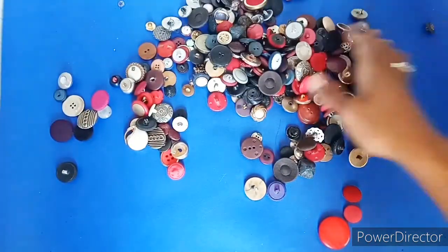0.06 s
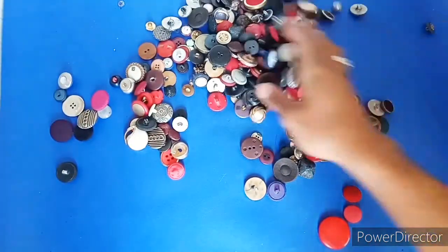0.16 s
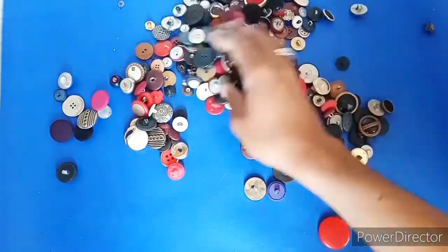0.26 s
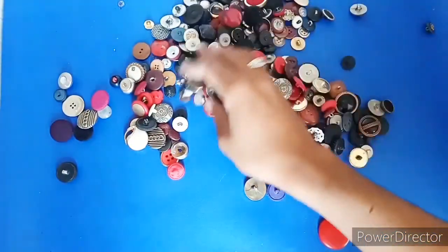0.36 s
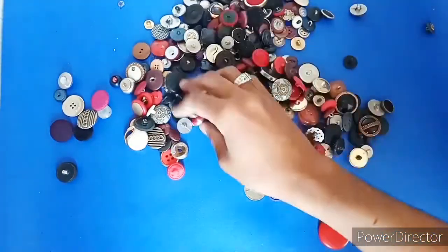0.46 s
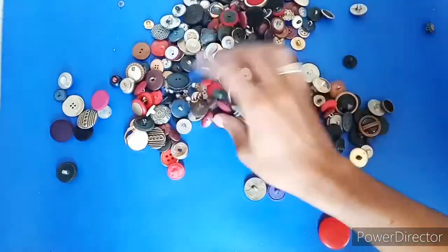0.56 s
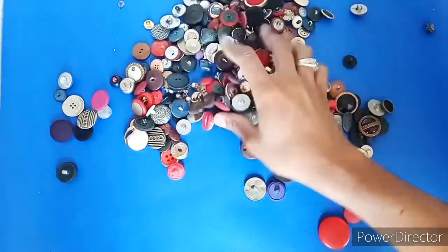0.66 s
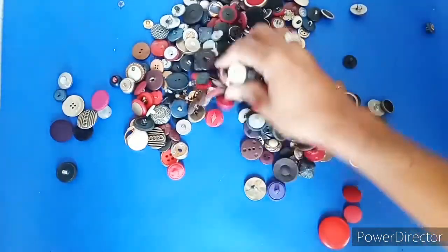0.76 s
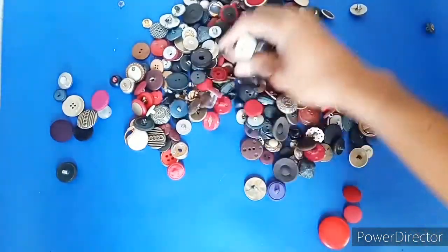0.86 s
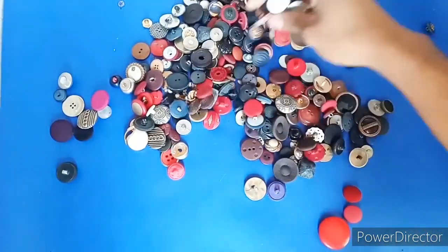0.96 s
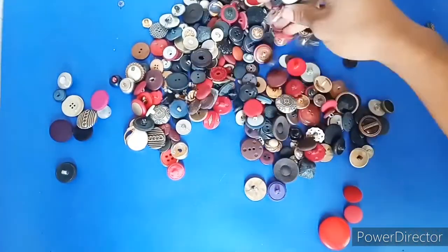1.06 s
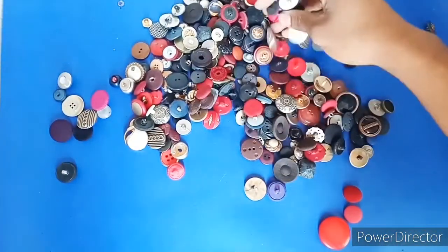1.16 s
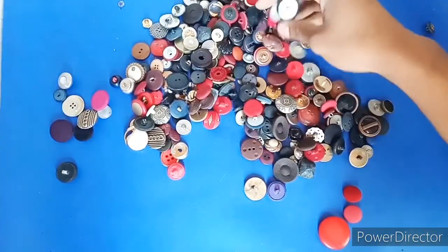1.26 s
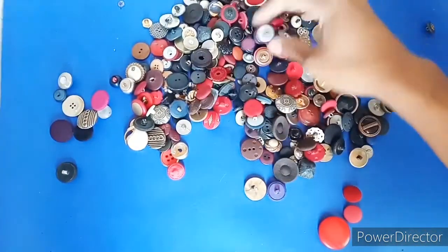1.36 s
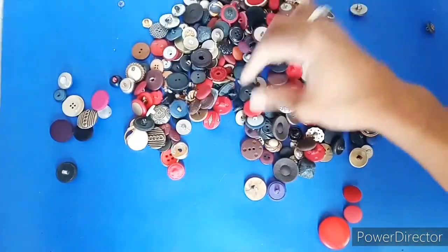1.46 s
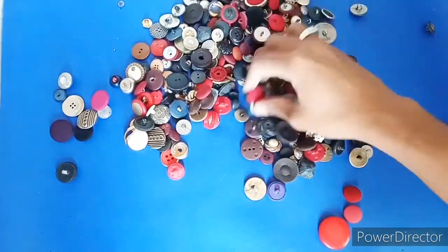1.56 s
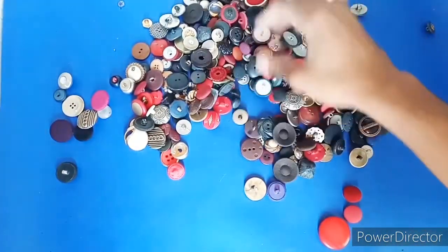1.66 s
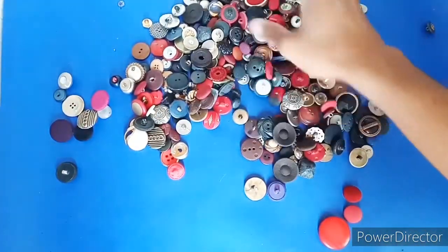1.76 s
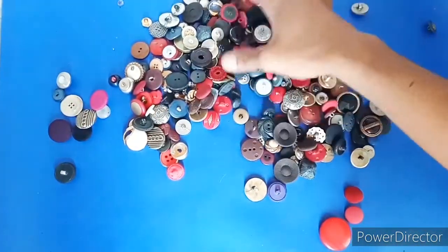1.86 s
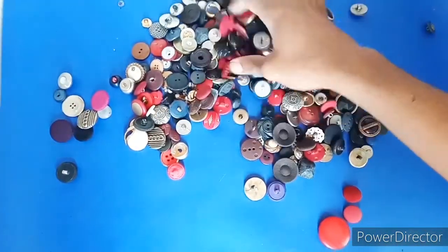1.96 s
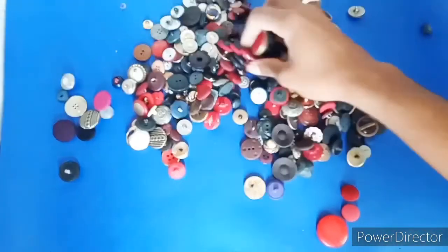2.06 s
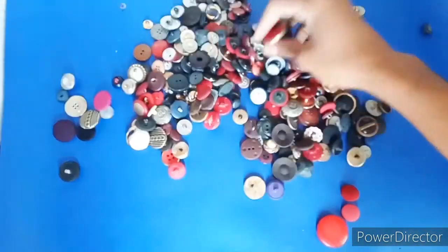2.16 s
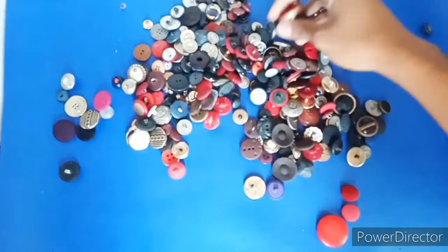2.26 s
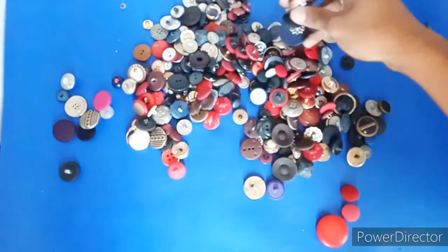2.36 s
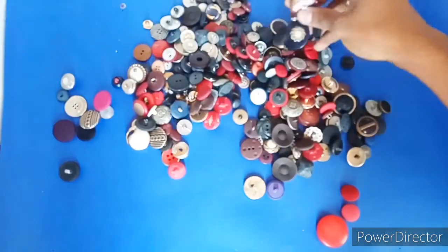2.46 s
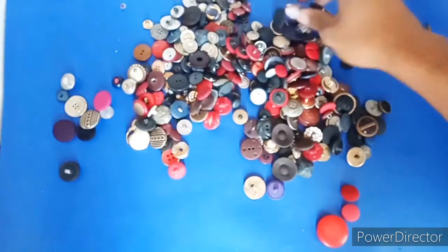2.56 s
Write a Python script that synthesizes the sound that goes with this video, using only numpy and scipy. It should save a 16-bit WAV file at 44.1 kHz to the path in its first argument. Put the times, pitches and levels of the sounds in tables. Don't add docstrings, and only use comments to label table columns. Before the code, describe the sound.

Buttons being stirred and dropped in a pile, clicking and knocking in bursts on a thin board

```python
import sys
import numpy as np
from scipy import signal
from scipy.fft import rfft, irfft
from scipy.io import wavfile
from scipy.ndimage import uniform_filter1d

SR = 44100
rng = np.random.default_rng(int(sys.argv[2]) if len(sys.argv) > 2 else 0)


def invert_db(level):
    return 10 ** (np.asarray(level, dtype=float) / 20)


def unload_wav(signal):
    wavfile.write(
        sys.argv[1],
        SR,
        np.round(np.clip(np.atleast_2d(signal).T, -1, 1) * 32767).astype(np.int16),
    )


N = 114660

# f/Hz, level/dB
HUSH_SPECTRUM = [(18, -33), (30, 16.5), (709, 6.5), (917, 3.5), (1570, -0.5), (1980, 6.5), (13000, -21.5),
                 (14000, -61)]
# f/Hz, level/dB
RUB_SPECTRUM = [(30, -27), (100, -17), (155, -3.5), (200, -9.5), (265, 2.5), (340, -2)]
# start t/s, length t/s, level/dB, f/Hz, t60 t/s
DRAGS = [
    (0.39, 0.027, -46.5, 6950, 0.042),
    (.63, 0.012, -56, 7100, .02),
    (1.721, 0.054, -41, 639, 0.12),
    (1.801, 0.024, -46.5, 625, 0.02),
    (2.002, 0.11, -39.5, 906, 0.078),
    (2.061, 0.041, -54, 7160, 0.041),
    (2.117, 0.086, -38, 1644, 0.033),
]
# f/Hz, level/dB, t60 t/s
BOARD_MODES = [(476.2, -10.5, 0.54), (610, 4.5, 0.11), (635, 9.5, 0.052), (797, 11, 0.017),
               (907, 14.5, 0.048), (955, 15.5, 0.019), (1200, 13.5, 0.023), (1567, 17, 0.019),
               (1894, 4.5, 0.071)]
# f/Hz, level/dB
BUTTON_SPECTRUM = [(1060, -30), (1800, 2.5), (2490, -6), (4360, 1.5), (5260, -10), (7230, -12.5),
                   (8440, -22.5), (13100, -43), (14000, -46)]
# t/s, stirring force level/dB, clack share level/dB re force
SWEEPS = [
    [(0, -34, -5.5), (.015, -41, -4.5), (.05, -50, -5), (.09, -57.5, -8), (.13, -108.5, 10)],
    [(.19, -82, -10), (.208, -47.5, 1), (.236, -61.5, 12.5), (.241, -31, -0.5), (.3, -24, -3.5),
     (.45, -31.5, -4.5), (.53, -27.5, -8), (.65, -35.5, -6.5), (.72, -35, -6.5), (.8, -46.5, -6)],
    [(.805, -49.5, -8), (.83, -37.5, -1), (.9, -24, -5.5), (.96, -38, -6), (1.03, -40, -2.5),
     (1.06, -40, -16), (1.1, -36.5, -6), (1.14, -53, -4.5), (1.2, -49, -8)],
]
# t/s, stirring force level/dB, clack share level/dB re force
LATER_SWEEPS = [
    [(1.222, -29.5, -5), (1.27, -30, -19), (1.33, -25, -12.5), (1.41, -43.5, -13), (1.45, -30, -7),
     (1.5, -39, -17.5), (1.6, -46.5, -13), (1.66, -53, -10)],
    [(1.665, -44, -10), (1.685, -38, -3.5), (1.74, -35.5, -3.5), (1.79, -46, -8), (1.82, -51.5, -6),
     (1.85, -69, -19), (1.95, -77, -6)],
    [(1.945, -75, -6), (1.962, -52, -7), (1.975, -50.5, -13), (2.02, -35, 0), (2.16, -27.5, -4),
     (2.26, -36.5, -7), (2.32, -37.5, 3), (2.39, -51, -2), (2.54, -58, -8.5)],
    [(2.552, -49, -34.5), (2.565, -47, 2), (2.575, -42, -2.5), (2.6, -45, -9)],
]
# t/s, peak level/dB, favoured mode f/Hz, bunch length t/ms
KNOCKS = [(0.012, -28.5, 650, 4.4), (.209, -41, 564, 5.2), (.244, -24.5, 620, 13), (.36, -16.5, 1200, 4),
          (.498, -14.5, 646, 3.6), (0.537, -28, 920, 4.4), (0.678, -35, 606, 18), (.818, -34, 619, 5),
          (.857, -21.5, 630, 5), (.962, -26, 580, 6.2), (1.294, -25, 900, 4.7), (1.527, -32.5, 870, 5.7),
          (1.69, -31, 611, 5.5), (1.926, -57, 620, 3), (1.972, -36, 842, 4), (2.009, -27, 883, 11.4),
          (2.044, -28, 894, 5), (2.064, -22, 900, 4.9), (2.111, -25, 813, 3.5), (2.197, -20.5, 880, 6),
          (2.288, -19.5, 1570, 3.4), (2.354, -27, 810, 3.7), (0.269, -20, 902, 1.2),
          (0.293, -17.5, 940, 8.6), (0.468, -14, 804, 1.9), (0.524, -19.5, 642, 16.3),
          (0.574, -15, 687, 9.7), (0.695, -21, 610, 7.2), (0.751, -28.5, 600, 5.7), (0.829, -17, 935, 7.7),
          (0.911, -13, 956, 7.7), (1.035, -13, 636, 2.7), (1.078, -22, 610, 9.2), (1.118, -17.5, 670, 9.7),
          (1.218, -3.5, 630, 4.3), (1.241, -17, 633, 5.4), (1.279, -21.5, 900, 4.6), (1.309, -7, 965, 5),
          (1.336, -13, 880, 5.5), (1.425, -22.5, 624, 4), (1.451, -14.5, 810, 4.8), (1.711, -27.5, 613, 15),
          (1.735, -21.5, 622, 6.1), (1.754, -24, 601, 4.4), (1.802, -38, 610, 1.9), (2.155, -16.5, 863, 12),
          (2.317, -26, 920, 9.6), (2.397, -22, 998, 4.2), (2.549, -29.5, 860, 5.3),
          (2.569, -28.5, 840, 3.5)]
# t/s, peak level/dB, ring f/Hz
CLACKS = [(1.3095, -17.5, 2700), (2.577, -35.5, 2900), (1.279, -20.5, 2040), (0.239, -21, 4010),
          (.268, -21.5, 4300), (.312, -34, 4400), (0.4676, -21.5, 3170), (.4968, -25, 2940),
          (0.5253, -18.5, 2160), (0.829, -30.5, 4500), (.8929, -29.5, 4070), (1.2184, -28.5, 4500),
          (1.232, -36, 4770), (1.3085, -21.5, 4400), (1.7135, -22, 4570), (2.0066, -32.5, 4410),
          (2.0218, -27, 3830), (2.3565, -26.5, 3220), (2.5511, -44, 3780), (0.0853, -42.5, 2860),
          (0.2992, -19, 4300), (0.3526, -17.5, 4050), (0.6388, -30, 4600), (0.6887, -28, 3400),
          (0.857, -23.5, 2590), (0.923, -22, 3800), (0.9432, -16.5, 4250), (1.0025, -27, 5000),
          (1.077, -26.5, 4400), (1.2504, -31, 3900), (1.3085, -18, 3710), (1.3578, -27, 4640),
          (1.4477, -33, 2550), (1.684, -28, 4250), (1.802, -21, 4150), (1.926, -62, 4600),
          (1.9774, -32.5, 2960), (2.0153, -24, 3360), (2.0378, -25, 4120), (2.1275, -20, 3020),
          (2.19, -17, 3210), (2.239, -25.5, 2630), (2.288, -32, 3250), (2.3072, -21, 4020),
          (2.4402, -41, 2600), (2.4563, -34, 2610), (2.5699, -32.5, 2660)]
# t/s, peak level/dB, ring f/Hz
SNAPS = [(.258, -31, 6600), (.276, -37, 6400), (.303, -33, 7200), (.313, -35, 7300), (.333, -28, 6350),
         (.3476, -26, 7300), (.36, -28, 7300), (.405, -42, 9600), (.425, -48, 9600), (.639, -48, 8400),
         (.815, -47, 7000), (2.178, -46, 7100), (2.289, -58, 9100), (2.5676, -38.5, 7400),
         (.241, -24, 6140), (.4575, -43, 9700), (.4865, -44, 9200), (0.65, -46, 9670), (.7625, -47, 10400),
         (.826, -45.5, 8140), (1.0195, -45, 8200), (1.0295, -44, 9730), (1.231, -39, 8700),
         (1.278, -41.5, 10000), (1.408, -49, 8500), (1.4705, -41.5, 10600), (1.802, -40, 9560),
         (2.232, -48, 10900), (2.303, -22, 6880)]


def read(points, hz):
    f, value = np.transpose(points)
    return np.interp(np.log(hz + 1), np.log(f + 1), value)


def evened(x):
    return x / np.sqrt(np.mean(x ** 2) + 1e-20)


def add(mix, s, sound):
    part = mix[round(s * SR):][:len(sound)]
    part += sound[:len(part)]


def decaying(hz, db, t60, t):
    return invert_db(db - 60 * t / t60) * np.sin(2 * np.pi * hz * t)


def coloured(points):
    hz = np.fft.rfftfreq(N, 1 / SR)
    gain = invert_db(read(points, hz)) / (1 + (hz / points[-1][0]) ** 4)
    return evened(irfft(rfft(rng.standard_normal(N)) * gain, N))


def hush():
    return invert_db(-74.5) * coloured(HUSH_SPECTRUM)


def room(x):
    level_db, t60 = -11, 0.1
    t = np.arange(10000) / SR
    tail = rng.standard_normal(len(t)) * invert_db(-60 * t / t60) * (t > .003)
    return invert_db(level_db) * signal.fftconvolve(x, tail / np.linalg.norm(tail))[:N]


def drag():
    out = np.zeros(N)
    for (start, length, db, hz, t60), d in zip(DRAGS, rng.standard_normal((len(DRAGS), 9000))):
        t = np.arange(0, length, 1 / SR)
        slips = d[:len(t)] * np.sin(np.pi * t / length)
        add(out, start, invert_db(db) * evened(signal.fftconvolve(slips, decaying(hz, 0, t60, t))))
    return out


def board(tone_hz, crack_db, draw):
    t = np.arange(5000) / SR
    count = len(BOARD_MODES)
    hz, db, t60 = np.transpose(BOARD_MODES)[:, :, None]
    hz = hz * (1 + .012 * draw[-count:, None].clip(-2, 2))
    place_db = 3 * draw[:count, None].clip(-1.5, 1.5)
    favour_db = 12 * np.exp(-(np.log2(hz / tone_hz) / 0.065) ** 2)
    ring = decaying(hz, db + place_db + favour_db, t60, t).sum(0)
    thump_db, thump_s, thump_band_hz = 9, 0.015, (495, 2100)
    burst = np.resize(draw, len(t)) * np.exp(-t / thump_s)
    ring += invert_db(thump_db) * signal.lfilter(*signal.butter(2, thump_band_hz, "band", fs=SR), burst)
    thud_db, thud_t60 = 20.5, 0.024
    ring += decaying(1.116 * tone_hz, thud_db, thud_t60, t) * np.minimum(t * tone_hz, 1)
    contact_ms = 0.048
    u = np.arange(200) / (SR * contact_ms / 1000)
    contact = u * np.exp(-u)
    out = np.convolve(ring, contact / contact.sum())
    out[:len(t)] += invert_db(crack_db) * np.diff(burst, prepend=0) * np.exp(-t / 0.0012)
    return signal.lfilter(*signal.butter(3, 414, "high", fs=SR), out)


def button(hz, draw):
    tick_db, tick_s, attack_s = -13.5, 0.0012, 0.00024
    t = np.arange(1500) / SR
    out = invert_db(tick_db) * np.diff(draw, prepend=0) * np.exp(-t / tick_s) * .5
    t60 = 0.0093 * invert_db(1.5 * draw[1].clip(-2, 2))
    twin_hz = hz * (1 + draw[2].clip(-1.5, 1.5) / 18)
    upper_hz = min(hz * (1.2 + 0.31 * draw[0]), 14000)
    for f, db in ((hz, 0), (twin_hz, -3), (upper_hz, -6)):
        tilt_db = 0.52 * (read(BUTTON_SPECTRUM, f) - read(BUTTON_SPECTRUM, hz))
        out += decaying(f, db + tilt_db, t60, t) * np.minimum(t / attack_s, 1)
    return out


def hand():
    clump_db, clump_s = 1.5, 0.007
    t, force, share = np.arange(N) / SR, np.zeros(N), np.zeros(N)
    for stroke in SWEEPS + LATER_SWEEPS:
        s, db, rel_db = np.transpose(stroke)
        force = np.maximum(force, invert_db(np.interp(t, s, db, -120, -120)))
        share = np.maximum(share, invert_db(np.interp(t, s, db + rel_db, -120, -120)))
    wander = evened(uniform_filter1d(rng.standard_normal(N), int(clump_s * SR)))
    clumps = invert_db(clump_db * wander)
    return force * clumps, share * clumps, force


def stream(level, per_s, spread_db, shapes):
    size = invert_db(spread_db * np.minimum(rng.exponential(1, N), 3))
    size = size * (rng.random(N) < per_s / SR) * rng.choice([-1, 1], N)
    which = rng.integers(0, len(shapes), N)
    shape_energy = np.mean([(s ** 2).sum() for s in shapes])
    norm = np.sqrt(np.mean(size ** 2) * shape_energy)
    out = np.zeros(N)
    for k, shape in enumerate(shapes):
        out += signal.oaconvolve(size * level * (which == k), shape)[:N]
    return out / norm


def stirring():
    force, share, smooth = hand()
    place_draws = rng.standard_normal((12, 600))
    places = [board(f, -5, d) for f, d in zip(np.geomspace(500, 1700, num=12), place_draws)]
    tick_draws = rng.standard_normal((8, 1500))
    ticks = [button(f, d) for f, d in zip(np.geomspace(7000, 12500, num=8), tick_draws)]
    disc_draws = rng.standard_normal((40, 1500))
    discs = [invert_db(read(BUTTON_SPECTRUM, f)) * button(f, d)
             for f, d in zip(np.geomspace(2000, 9000, num=40), disc_draws)]
    out = invert_db(-2) * stream(force, 1500, 4, places)
    out += invert_db(-1) * stream(share, 2200, -1.5, discs)
    out += invert_db(-36.5) * stream(share, 60, 3.7, ticks)
    rub_db = -26
    return out + invert_db(rub_db) * smooth ** 0.63 * coloured(RUB_SPECTRUM)


def chatter(sound, ms, draw):
    u = np.arange(len(draw)) / (max(ms, .5) * SR / 4000)
    contacts = (abs(draw) > 1.9) * np.sign(draw) * (u + 0.26) * np.exp(-u)
    contacts += (u == 0) * 0.089
    z = rfft(contacts, n=4096)
    evenness = 0.23
    z = z / uniform_filter1d(abs(z), size=9) ** evenness
    bunch = irfft(z)[:len(draw)] * np.exp(-u / 4)
    out = np.convolve(sound, bunch)
    return out / abs(out).max()


def hits():
    legs_db, legs_hz, legs_t60 = -31.5, 163, 0.069
    crack_db, clack_ms = 1.5, 8.2
    out, t = np.zeros(N), np.arange(5000) / SR
    for (s, db, hz, ms), d in zip(KNOCKS, rng.standard_normal((len(KNOCKS), 1200))):
        add(out, s, invert_db(db) * chatter(board(hz, crack_db, d[:600]), ms, d[100:]))
        add(out, s, decaying(legs_hz, db + legs_db, legs_t60, t))
    strikes = CLACKS + SNAPS
    for (s, db, hz), d in zip(strikes, rng.standard_normal((len(strikes), 1500))):
        add(out, s, invert_db(db) * chatter(button(hz, d), clack_ms, d[700:]))
    return out


def scene():
    dry = stirring() + hits() + drag()
    return (dry + room(dry) + hush())[None]


def low_pass(x):
    return signal.sosfilt(signal.butter(12, 14340, fs=SR, output="sos"), x)


def record(dry):
    mic = signal.lfilter(*signal.butter(2, 8000, fs=SR), dry)
    mic = signal.sosfilt(signal.butter(3, 40.2, "high", fs=SR, output="sos"), mic)
    mic = signal.sosfilt(signal.butter(8, 12100, fs=SR, output="sos"), mic)
    return low_pass(mic)


dry = scene()
out = record(dry)
unload_wav(out)
```